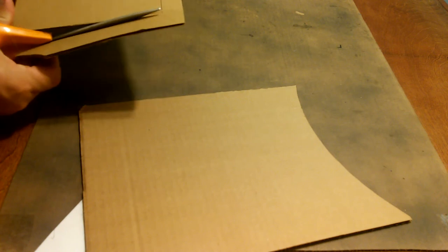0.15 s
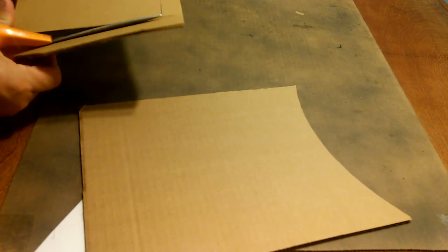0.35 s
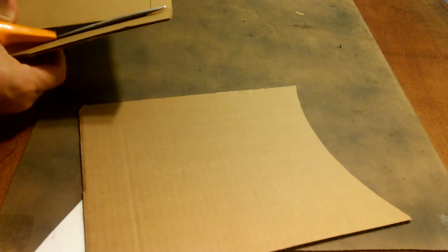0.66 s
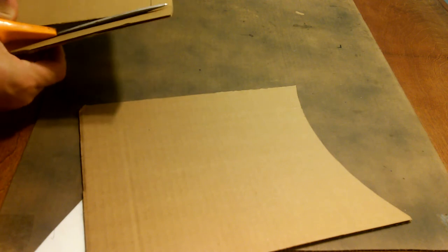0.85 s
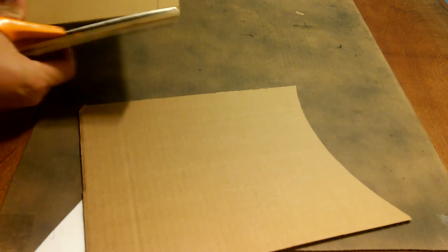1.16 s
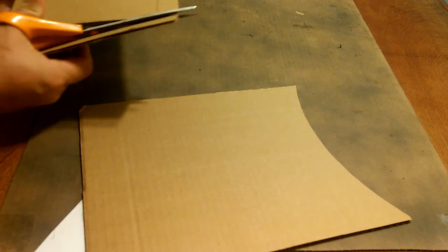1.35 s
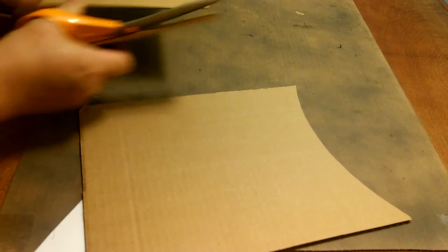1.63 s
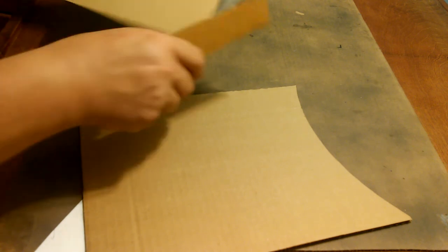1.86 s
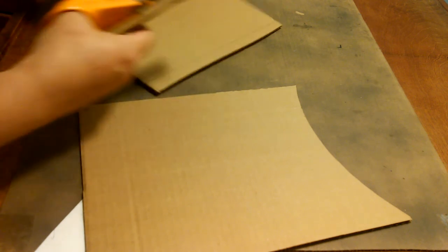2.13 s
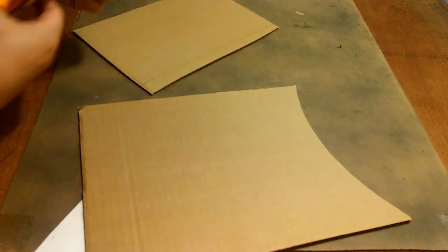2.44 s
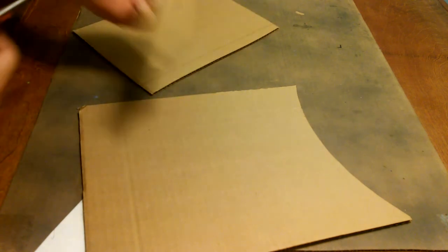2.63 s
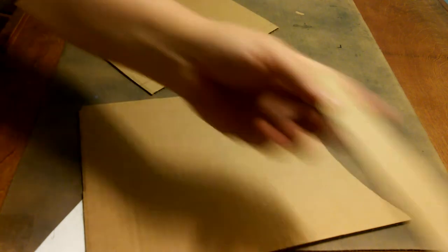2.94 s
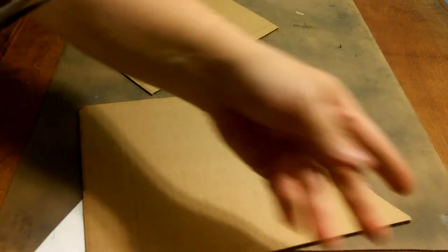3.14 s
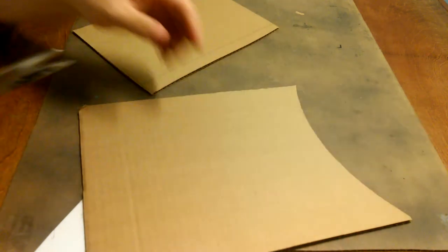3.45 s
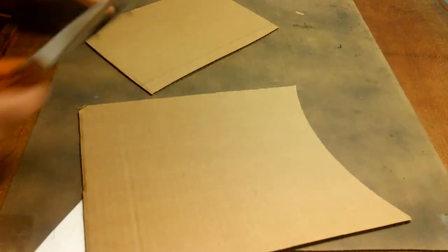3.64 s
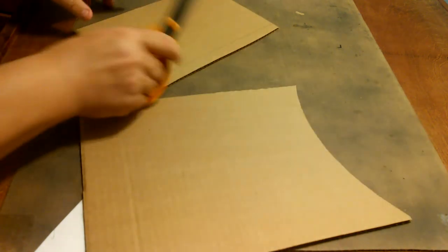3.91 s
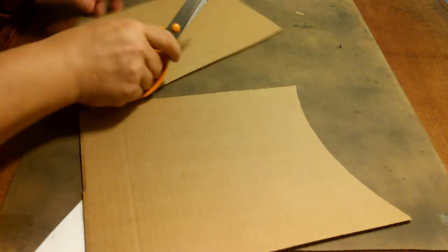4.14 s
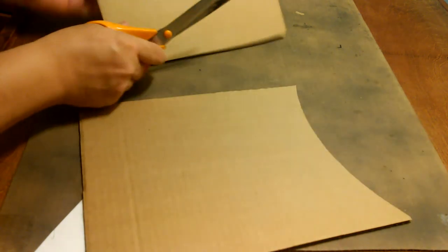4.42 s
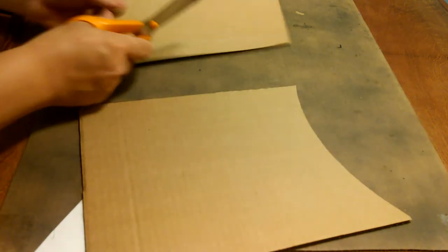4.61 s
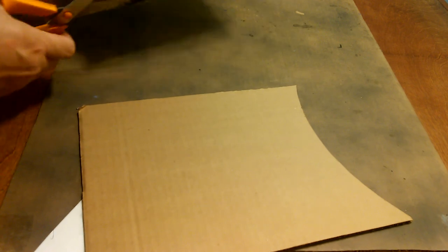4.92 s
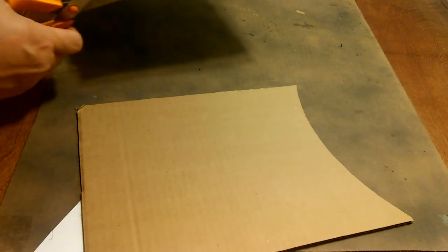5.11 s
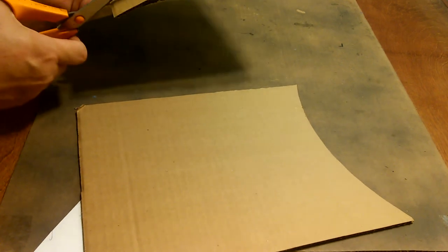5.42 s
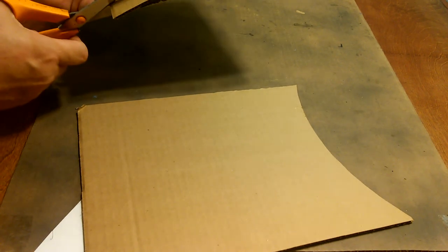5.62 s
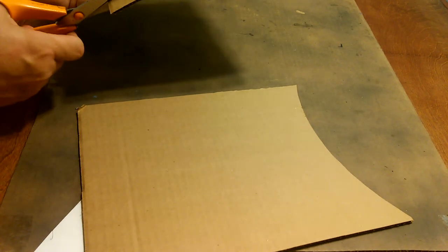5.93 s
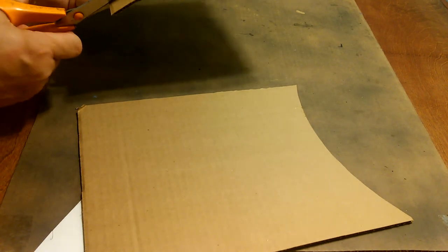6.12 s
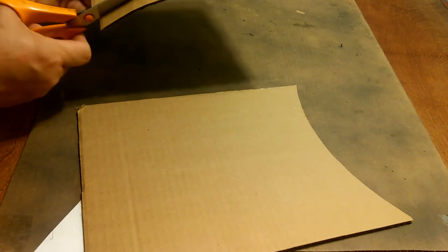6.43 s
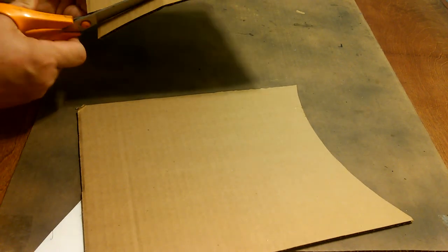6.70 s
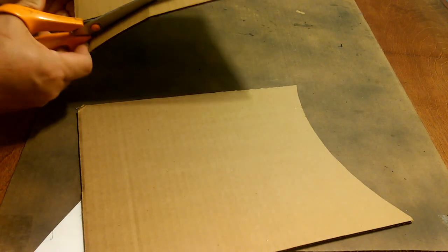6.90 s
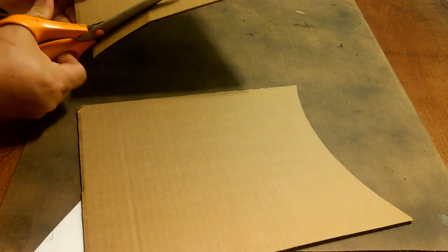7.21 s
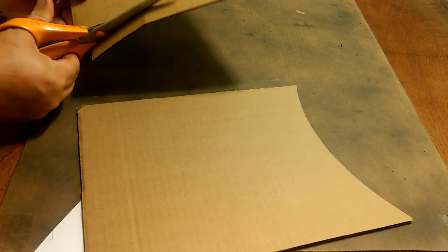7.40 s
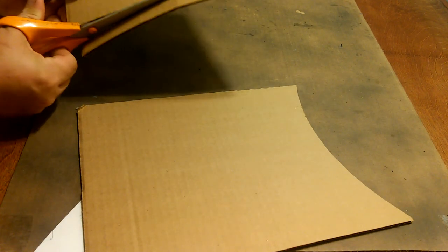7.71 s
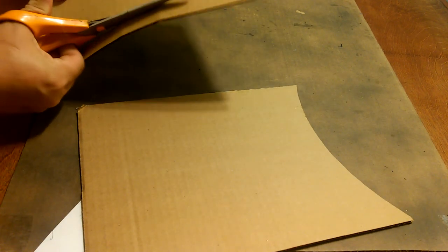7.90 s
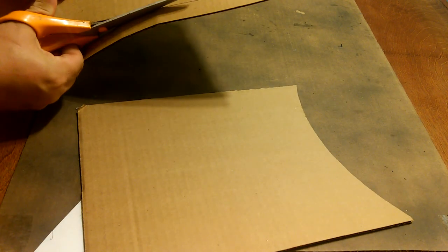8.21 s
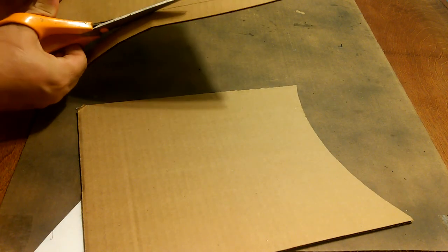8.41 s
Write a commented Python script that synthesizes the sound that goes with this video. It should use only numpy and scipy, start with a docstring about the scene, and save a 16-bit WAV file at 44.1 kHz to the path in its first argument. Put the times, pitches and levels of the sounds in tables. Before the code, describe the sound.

Close, bright sound of scissors cutting corrugated cardboard at a table in a small room. Sharp crunches and steely rubs come first, then a sheet slaps down, with light scrapes, ticks and dull knocks of handling. After a near-quiet pause with one tiny pivot squeak and a faint card creak, three strong crackling cuts follow. A low mains hum stays faintly underneath.

```python
"""Scissors bite through corrugated cardboard at a work table in a small room: flutes crack in spiky noise bursts
with single-fibre ticks between, and blades and sheets rub as grainy noise with a ringing edge.
Sheets and handles drop onto resonant modes, edges catch as narrow noise, and the pivot squeaks once as a
pitched tone before the card creaks. Mains hum and room noise lie underneath; the mono sound is bright, each
stretch of it gets a noise-built reverb tail, and a noise gate ducks the quiet moments."""
import sys
import numpy as np
from scipy import signal
from scipy.fft import rfft, irfft, next_fast_len
from scipy.io import wavfile
from scipy.ndimage import uniform_filter1d, map_coordinates

SR = 44100
rng = np.random.default_rng(int(sys.argv[2]) if len(sys.argv) > 2 else 0)


def generate_wav(signal):
    """Clip the signal to [-1, 1] and save it as 16-bit WAV at the path in sys.argv[1]."""
    frames = np.transpose(np.atleast_2d(signal))
    scaled = np.clip(frames, -1, 1) * 32767
    pcm = np.round(scaled).astype(np.int16)
    wavfile.write(sys.argv[1], SR, pcm)


N = 377055  # samples, about 8.55 s

# Mains hum lines: pitch_hz, level_db (rms, before a slow wobble)
HUM_LINES = [(59, -73), (108, -81.5), (120.5, -64.5), (150, -85.5), (185, -83), (314, -96.5)]
# Colour of the room's own noise: frequency_hz, density_db (relative, per Hz)
ROOM_NOISE = [(20, -14), (55, -1.5), (130, 1.5), (250, -12.5), (600, -23), (3000, -24), (8000, -31),
              (14000, -23), (16000, -29.5)]
# Rubbing strokes of steel and card: start_s (hold begins), held_s, hiss_db, mid_db (re hiss),
# board_db (re hiss), edge_hz
STROKES = [(0.099, .05, -83, -2, 2, 2560), (.25, 0.24, -46.5, -22, -29, 2780),
           (0.598, 0.051, -30.5, -16, -32, 4360), (.77, 0.056, -74, 1, -4, 2997),
           (0.931, 0.066, -49, -39.5, -38, 2710), (0.996, 0.012, -40, -13.5, -28, 2758),
           (1.226, 0.044, -28.5, -18, -25, 3506), (1.382, 0.087, -44.5, -24, -22.5, 3350),
           (1.62, 0.1, -44.5, -17, -23, 2200), (1.79, 0.033, -46, -20, -25.5, 2100),
           (1.862, 0.051, -54, -22, -29, 2367), (1.968, 0.099, -38.5, -26, -34, 2900),
           (2.116, 0.0031, -31, -18.5, -16, 1822), (2.201, 0.054, -45, -20, -23.5, 3033),
           (2.47, 0.046, -32.5, -19, -55, 5308), (2.63, 0.064, -39.5, -23.5, -41, 3686),
           (2.73, 0.043, -47, -24, -38.5, 3970), (2.799, 0.077, -39, -26.5, -45.5, 4100),
           (2.968, 0.0076, -50, -30, -62.5, 4600), (3.03, 0.086, -67, -5.5, -19.5, 3520),
           (3.27, 0.011, -52.5, 5, -5.5, 4480), (3.39, 0.031, -57, -15, -14, 3507),
           (3.466, .005, -41, -8.5, -31, 2880), (3.529, 0.097, -59.5, -14, -22, 3540),
           (3.82, 0.19, -65.5, -10, -25, 5360), (3.972, 0.037, -41, -22.5, -39, 4710),
           (4.052, 0.041, -35.5, -17, -51, 5340), (4.122, 0.085, -44, -16, -44, 4885),
           (4.274, 0.16, -28, -13.5, -45, 3640), (4.439, 0.13, -35, -13, -16, 3455),
           (4.65, .12, -50.5, -25, -21, 2426), (4.841, 0.032, -38.5, -15.5, -45, 4390),
           (5.03, 0.028, -75, -2.5, -10.5, 2970), (5.13, 0.068, -47, -22.5, -18, 2980),
           (5.21, 0.062, -67.5, -22.5, -9, 3320), (5.88, 0.026, -76.5, -31, -22, 4500),
           (5.929, .01, -41, -31.5, -35, 5105), (6.368, 0.072, -28.5, -16, -32, 3950),
           (6.554, 0.0078, -34.5, -27, -41, 4590), (6.819, 0.06, -26, -19, -24.5, 2502),
           (7.03, .06, -71.5, -2.5, -3.5, 2600), (7.202, 0.087, -43, -19.5, -31, 5220),
           (7.331, 0.037, -77, -19, -8, 4020), (7.42, 0.026, -53, -37, -29, 2974),
           (7.472, 0.081, -44.5, -17, -29, 3074), (7.808, 0.055, -24, -16, -22.5, 3854),
           (8.05, 0.022, -60.5, -8, -11, 5235), (8.108, 0.0067, -38.5, -16.5, -33, 5720),
           (8.16, 0.052, -59, -8, -21.5, 5150), (8.34, 0.068, -33.5, -17, -39, 4915),
           (8.51, 0.044, -45.5, -35, -27, 5714)]
# Flutes cracking and edges ticking: start_s, level_db (burst energy re a 1 ms click), mid_db (re hiss),
# board_db (re hiss), edge_hz, board_hz (favoured modes), decay_t60_s
CRACKS = [(0.2243, -36.5, -39, -34, 3350, 342, 0.026), (0.2513, -23.5, -26, -38.5, 2450, 985, 0.028),
          (0.2989, -29.5, -24, -49.5, 1950, 1320, 0.022), (0.367, -4.5, -12, -14.5, 1670, 1510, 0.05),
          (0.374, -1, -13.5, -13, 1610, 920, 0.03), (0.417, -7, -13, -14.5, 1920, 465, 0.015),
          (0.578, -26, -24, -25, 1610, 1490, 0.026), (0.5905, -21.5, -23, -25.5, 5350, 1020, 0.026),
          (0.9244, -34.5, -35.5, -33.5, 5680, 511, 0.029), (1.0032, -13.5, -12.5, -21, 1650, 1250, 0.015),
          (1.0096, -5, -16.5, -13.5, 1680, 950, 0.038), (1.0291, -3.5, -16.5, -17, 4430, 1250, 0.024),
          (1.0454, -6, -16, -11.5, 2090, 670, 0.025), (1.2088, -23, -18.5, -25, 3450, 550, 0.024),
          (1.4175, -1.5, -16, -20.5, 3300, 942, 0.021), (1.427, 0.5, -13, -10.5, 1650, 1520, 0.011),
          (1.431, -2.5, -8.5, -12.5, 1940, 560, 0.036), (1.5907, -25, -21, -35.5, 2110, 1140, 0.016),
          (1.5974, -14.5, -17.5, -26, 2090, 1100, 0.034), (1.8636, -34.5, -38, -41.5, 2930, 1207, 0.024),
          (2.0236, -16, -13.5, 0.5, 1800, 608, 0.029), (2.0444, -20.5, -26, 4.5, 1680, 1080, 0.011),
          (2.4127, -25, -13.5, -46.5, 3080, 680, 0.072), (2.4537, -28, -16, -40.5, 3600, 1300, 0.026),
          (2.4885, -26, -7.5, -44.5, 5370, 1208, 0.026), (2.6066, -31.5, -27, -40, 3050, 510, 0.026),
          (2.9532, -31, -26, -48.5, 3640, 306, 0.018), (2.9676, -20, -27.5, -64, 2730, 301, 0.011),
          (3.1917, -23, -18.5, -43, 4770, 1150, 0.026), (3.2015, -15, -15.5, -55, 4370, 353, 0.022),
          (3.2327, -19.5, -12, -28, 2800, 904, 0.022), (3.239, -11.5, -15, -35, 2320, 851, 0.013),
          (3.2508, -16.5, -7, -35, 2950, 859, 0.015), (3.3184, -33.5, -25, -25, 2040, 953, 0.018),
          (3.3466, -17, -12, -36, 4010, 487, 0.018), (3.356, -33, -26, -23, 4670, 856, 0.019),
          (3.4125, -26.5, -11, -28.5, 3040, 697, 0.028), (3.4386, -29, -23, -22.5, 2195, 1150, 0.01),
          (3.463, -24, -13.5, -37, 2300, 1330, 0.019), (3.476, -33, -32, -34, 2660, 1130, 0.026),
          (3.6166, -44.5, -28, -38, 2530, 630, 0.026), (3.9215, -35.5, -19.5, -32.5, 5530, 413, 0.038),
          (3.9763, -30.5, -20, -39, 1970, 1080, 0.026), (4.2452, -27, -17, -47, 2570, 298, 0.038),
          (4.2726, -26, -26, -37, 5170, 1080, 0.029), (4.3343, -15.5, -31, 2.5, 1670, 815, 0.034),
          (4.5395, -21, -27, -18.5, 5460, 435, 0.038), (4.624, -20, -11.5, -21.5, 2140, 460, 0.045),
          (4.815, -32, -23, -36.5, 3180, 318, 0.038), (5.1137, -36.5, -24.5, -15, 2470, 1040, 0.029),
          (5.895, -44, -19.5, -28.5, 5730, 493, 0.026), (5.928, -24, -30.5, -41, 3670, 1020, 0.036),
          (5.9678, -14.5, -21.5, -25.5, 5660, 1070, 0.02), (6.0103, -7, -25, -31.5, 4870, 861, 0.026),
          (6.038, -10, -15, -46, 5520, 802, 0.049), (6.0402, -1.5, -24.5, -27, 3420, 695, 0.023),
          (6.066, -6, -16, -20, 5360, 716, 0.047), (6.0788, -8, -15.5, -14.5, 4140, 692, 0.035),
          (6.103, -7.5, -15.5, -12.5, 5260, 694, 0.034), (6.1389, -3.5, -17, -15, 4870, 780, 0.025),
          (6.169, -10, -20, -8.5, 2300, 756, 0.022), (6.194, -13, -11.5, -9.5, 1670, 790, 0.016),
          (6.3577, -22.5, -22.5, -38, 5010, 856, 0.03), (6.5573, -24, -28, -51, 5030, 431, 0.023),
          (6.586, -24, -16, -25.5, 4790, 533, 0.024), (6.5964, -10, -19, -25.5, 2170, 730, 0.026),
          (6.5952, -2, -19.5, -13, 1640, 875, 0.045), (6.6277, -10.5, -12.5, -5, 4820, 870, 0.015),
          (6.6345, -3, -19, -6.5, 4770, 600, 0.034), (6.6544, -5.5, -13, -11.5, 4900, 574, 0.03),
          (6.741, -19.5, -9, -27, 4800, 589, 0.023), (6.8066, -23.5, -17, -27.5, 5120, 1340, 0.026),
          (6.8666, -13, -12, -8, 1760, 1260, 0.018), (7.1927, -32.5, -20, -34, 5500, 1350, 0.041),
          (7.4749, -28.5, -14, -16.5, 2660, 1060, 0.031), (7.5318, -7, -18.5, -11.5, 4450, 696, 0.046),
          (7.5578, -3, -14.5, -11.5, 4700, 1340, 0.022), (7.5813, -3, -14, -7.5, 4660, 870, 0.039),
          (7.5885, -7, -29, -11, 1600, 721, 0.026), (7.5991, -7, -13.5, -14, 1570, 410, 0.012),
          (7.6153, -6.5, -17.5, -10, 1900, 393, 0.029), (7.759, -33.5, -19, -18, 2270, 786, 0.03),
          (7.794, -23, -22, -11, 1850, 427, 0.031), (7.8242, -14.5, -16.5, -17, 2400, 1300, 0.044),
          (8.0444, -32, -30, -26, 2490, 1370, 0.032), (8.096, -28, -23, -23.5, 4830, 1040, 0.037),
          (8.303, -34, -21, -20.5, 5100, 1340, 0.037), (8.5054, -26, -20.5, -27, 5540, 1320, 0.021)]
# Single fibres parting: centre_s, peak_db
FIBRE_TICKS = [(0.3755, -6), (1.0038, -17.5), (1.0112, -13.5), (1.0477, -11), (1.5926, -27), (1.5955, -26),
               (1.6002, -26.5), (2.4219, -30), (2.9702, -18), (3.1942, -31), (3.2033, -13), (3.2348, -18),
               (3.2402, -3), (3.2527, -24), (3.3177, -24), (3.3493, -22), (3.3574, -24), (3.4414, -27),
               (3.4646, -28), (3.4707, -31), (3.478, -26), (4.4961, -27), (4.6394, -29), (5.9275, -25),
               (6.0112, -16), (6.0388, -7.5), (6.0433, -7), (6.0485, -11), (6.0681, -10), (6.1412, -6),
               (6.1687, -11), (6.1953, -10.5), (6.1983, -17.5), (6.5625, -28), (6.5901, -21),
               (6.6002, -1.5), (6.6315, -9), (6.6388, -8), (6.6572, -6), (6.6711, -11), (6.7432, -25),
               (6.8685, -8), (7.5354, -15), (7.5569, -5), (7.5602, -6), (7.6039, -9), (7.6207, -9),
               (7.6819, -27), (7.8256, -19)]
# Sheets and handles landing: start_s, slap_db (energy re a 1 ms click), thump_db (re slap),
# slap_hz, thump_hz (favoured modes), rattle_t60_s
KNOCKS = [(1.425, -21, -15, 1250, 264.5, 0.022), (2.024, -8, -16, 657, 246, 0.028),
          (2.03, -45.5, 13.5, 601, 70, .1), (2.044, -20.5, -7, 1126, 199.6, 0.16),
          (3.203, -64.5, 21, 339, 150.2, 0.091), (3.234, -46, 5.5, 856, 128, 0.2),
          (3.444, -45.5, -15.5, 1150, 124, 0.066), (4.099, -72, 31.5, 301, 197, 0.086),
          (4.324, -31.5, 7.5, 444, 129, 0.18), (4.337, -17.5, -2, 755, 85.5, 0.17),
          (4.492, -26, 6.5, 700, 208, 0.078), (4.517, -46, 20.5, 334, 125.9, 0.052),
          (4.566, -71, 24, 902, 116, 0.081), (4.638, -57, 23, 432, 110, 0.05),
          (5.116, -41, -23, 1070, 127.4, 0.13), (5.616, -59, -29.5, 947, 120, 0.13),
          (5.97, -46.5, -30.5, 1070, 202.3, 0.06), (6.142, -32.5, -4, 780, 216, 0.056),
          (6.866, -29.5, -44.5, 1290, 128, 0.19), (7.26, -70, 16, 404, 200, .06),
          (7.586, -15, -13.5, 996, 299.4, 0.04), (7.603, -11.5, -17, 390, 270, 0.033)]
# Edges catching in brief pitched scrapes: start_s, pitch_hz, level_db (rms before the swell), length_s
CATCHES = [(1.591, 2054, -38, 0.022), (1.685, 3550, -61.5, 0.035), (1.774, 2080, -63, 0.056),
           (2.412, 2290, -58, 0.029), (2.49, 5450, -43, 0.024), (2.493, 1230, -64, 0.028),
           (2.623, 3060, -65, .053), (2.676, 3680, -65, 0.066), (2.797, 2280, -75, 0.11),
           (2.963, 2700, -74, 0.022), (3.072, 1390, -74.5, .06), (3.087, 2600, -70.5, .037),
           (3.229, 881, -45, 0.032), (3.781, 6640, -70.5, 0.16), (7.278, 780, -60.5, 0.035),
           (7.821, 1282, -34.5, 0.024), (8.086, 4810, -63.5, .11), (8.33, 4830, -55.5, .069),
           (8.341, 1236, -61, .088), (8.373, 1740, -56, .034)]
# Glide of the squeaking pivot: time_s, pitch_hz, level_db, octave_db
PIVOT_GLIDE = [(5.31, 1049, -99, -118), (5.346, 1072, -61.5, -80), (5.36, 1067, -52, -73),
               (5.378, 1082, -51, -84), (5.416, 1078, -49, -73), (5.488, 1075, -73, -103),
               (5.544, 1076, -77.5, -102), (5.58, 1049, -85, -110)]
# Glide of the flexing card: time_s, pitch_hz, level_db (before wobble), lower_mode_db
CREAK_GLIDE = [(5.5, 920, -90, -100), (5.525, 910, -64.5, -89.5), (5.56, 990, -76, -90),
               (5.6, 969, -69, -82.5), (5.618, 950, -55.5, -74), (5.685, 953, -64.5, -76),
               (5.72, 964, -85, -100), (5.76, 980, -77.5, -105), (5.79, 950, -95, -110)]

# Resonances of the held sheet: centre_hz, width_hz, level_db
HELD_SHEET = [(306, 20, 1), (410, 53, 2.5), (567, 86, 0.5), (721, 37, -0.5), (883, 96, 1), (1076, 130, 1.5),
              (1270, 560, -4), (1810, 90, -8.5)]
# Resonances of a sheet lying on the table: centre_hz, width_hz, level_db
LYING_SHEET = [(320, 56, -11), (445, 29, 1.5), (554, 51, -14), (643, 37, 5), (873, 120, -9.5),
               (1047, 130, 3), (1255, 210, -4.5)]
# Resonances of the table top: centre_hz, width_hz, level_db
TABLE_TOP = [(66.5, 110, -12.5), (121, 50, 3), (139, 110, -3), (201, 29, -5), (255, 37, -2)]
# Colour of the edge noise in the mids: frequency_hz, density_db (relative, per Hz)
MID_COLOUR = [(1500, -16), (1900, -3), (2500, -3), (3000, -4.5), (4500, -4), (6000, 0.5), (7500, -0.5),
              (9000, -34.5)]
# Colour of the treble: frequency_hz, density_db (relative, per Hz)
HISS_COLOUR = [(5000, -36.5), (7000, -19.5), (8500, -12.5), (11000, -7), (13000, -1), (14500, -4),
               (16000, 0.5)]
# Decay of the room by band: frequency_hz, t60_s
ROOM_DECAY = [(150, 0.37), (600, 0.19), (2000, 0.32), (8000, 0.27), (15000, 0.22)]

GRIP_DB_PER_S, LET_GO_DB_PER_S = 707.5, 346  # how fast a stroke takes hold and dies away
ARCH_DB = 2  # a held stroke is this much weaker at both ends than in its middle
FIRST_FIBRE_DB = -11.5  # the tick that opens every crack, re its hiss
TICK_S = 0.0006  # half width of a fibre tick
CATCH_WIDTH = 0.07  # width of a catch's ring as a share of its pitch
HIT_SEND_DB, RUB_SEND_DB, TICK_SEND_DB = -3, -6.5, -9  # how much of each group feeds the room
GATE_FLOOR_DB, GATE_BELOW_DB = -70, 31  # absolute threshold; distance under the recent level
GATE_MEMORY_S, GATE_SOFT_DB, GATE_DEPTH_DB = 0.12, 3, 10
TOP_HZ = 15850  # band limit


def amp(db):
    """Decibels to amplitude."""
    return 10 ** (np.asarray(db) / 20)


def unit(x):
    """x scaled to an rms of one."""
    return x / np.sqrt(np.mean(x ** 2) + 1e-20)


def peak(x):
    """x scaled to a peak of one."""
    return x / np.max(np.abs(x))


def energy(x):
    """x scaled so that a burst of any shape carries the energy of a 1 ms click."""
    return x / np.linalg.norm(x) * np.sqrt(SR / 1000)


def along(points, hz):
    """Interpolate (Hz, value) points on a log frequency axis."""
    point_hz, values = np.transpose(points)
    return np.interp(np.log(hz + 1), np.log(point_hz + 1), values)


def curves(rows, silent=-140):
    """One value per sample for each column after the time; silent fills both outer ends."""
    s, *columns = np.transpose(rows)
    time = np.arange(N) / SR
    return [np.interp(time, s, column, left=silent, right=silent) for column in columns]


def wobble(rate):
    """A smooth random curve, rate knots a second."""
    knots = rng.standard_normal(int(N * rate / SR) + 4)
    return map_coordinates(knots, [np.arange(N) * rate / SR])


def filtered(x, response):
    """x shaped by a real or complex response of frequency."""
    size = next_fast_len(x.shape[-1] + 4096)
    spectrum = rfft(x, size) * response(np.fft.rfftfreq(size, 1 / SR))
    return irfft(spectrum, size)[..., :x.shape[-1]]


def colour(points):
    """A noise colour table as a filter response."""
    return lambda hz: amp(along(points, hz))


def ring(hz, centre_hz, lift_db, octaves):
    """Gain of one broad resonance standing on a spectrum."""
    return amp(lift_db * np.exp(-(np.log2((hz + 1) / centre_hz) / octaves) ** 2))


def modes(table, scatter_db=0, centre_hz=700, slope_db=0):
    """Causal resonances at random strengths; grip and place favour those near centre_hz."""
    near_db = [-slope_db * abs(np.log2(c / centre_hz)) for c, _, _ in table]
    gains = amp(scatter_db * rng.standard_normal(len(table)) + near_db)

    def response(f):
        total = 0
        for k, (gain, (c, width, db)) in enumerate(zip(gains, table)):
            resonance = 1j * f * width / (c * c - f * f + 1j * f * width)
            total = total + (-1) ** k * gain * amp(db) * resonance  # neighbours in opposite phase
        return total
    return response


def turning_phase(hz, jitter, rate):
    """Running phase of a tone whose pitch jitters."""
    # abs keeps the silent filler a valid pitch
    return 2 * np.pi * np.cumsum(np.abs(hz) * (1 + jitter * wobble(rate))) / SR


def hum():
    """Slightly unsteady mains lines over the room's own noise."""
    t = np.arange(N) / SR
    lines = np.zeros(N)
    for hz, db in HUM_LINES:
        level = np.sqrt(2) * amp(db + 3.1 * wobble(11))
        lines += level * np.sin(2 * np.pi * hz * t + 0.43 * wobble(33))
    air = unit(filtered(rng.standard_normal(N), colour(ROOM_NOISE)))
    return lines + amp(-71) * air


def rubbing():
    """Friction noise with a grainy grip; the rubbed edge rings at a moving pitch, the sheet hums along."""
    time, gains = np.arange(N) / SR, np.zeros((3, N))
    for s, held, db, mid_db, board_db, _ in STROKES:
        loss_db = np.maximum(GRIP_DB_PER_S * (s - time), LET_GO_DB_PER_S * (time - s - held)).clip(0)
        loss_db += ARCH_DB * np.clip(2 * (time - s) / max(held, 0.002) - 1, -1, 1) ** 2
        gains += amp([[db], [db + mid_db], [db + board_db]]) * amp(-loss_db)
    hiss_gain, mid_gain, board_gain = gains
    edge_hz = curves(np.array(STROKES)[:, [0, -1]], silent=3000)[0]
    grip = unit(amp(1.7 * wobble(60) + 0.27 * wobble(760)))

    def layer(response):
        return unit(filtered(rng.standard_normal(N), response))

    # the mids follow the edge pitch and break into random patches of time and frequency
    hz, t, z = signal.stft(layer(colour(MID_COLOUR)), SR, nperseg=512)
    lift = ring(hz[:, None], np.interp(t, time, edge_hz), lift_db=5, octaves=0.2)
    patches = uniform_filter1d(uniform_filter1d(rng.standard_normal(z.shape), 4, 0), 12, 1)
    patchy = z * lift * amp(3.8 * unit(patches))
    mids = unit(signal.istft(patchy, SR, nperseg=512)[1][:N])
    hiss = layer(colour(HISS_COLOUR))
    board = layer(modes(HELD_SHEET))
    return grip * (hiss_gain * hiss + mid_gain * mids + board_gain * board)


def cracks():
    """A flute gives way in a spiky burst of tearing fibres that also shakes the held sheet."""
    out, t = np.zeros(N + SR), np.arange(SR // 8) / SR
    for s, db, mid_db, board_db, edge_hz, board_hz, t60 in CRACKS:
        fade = peak(amp(-60 * t / max(t60, 0.003)) * (1 - np.exp(-t / 0.014)))
        fibres = fade * amp(2.6 * map_coordinates(rng.standard_normal(400), [t * 1100]))  # spikes, 1100 knots/s
        noise = rng.standard_normal((3, len(t)))
        hiss = filtered(noise[0], colour(HISS_COLOUR))
        mid = filtered(noise[1], lambda hz: colour(MID_COLOUR)(hz) * ring(hz, edge_hz, lift_db=9.5, octaves=0.41))
        sheet = modes(HELD_SHEET, scatter_db=-0.5, centre_hz=board_hz, slope_db=12.5)
        # a small sheet shakes longer, without bass
        shaking = noise[2] * fibres ** 0.53
        board = energy(filtered(shaking, lambda hz: sheet(hz) * (1j * hz / (280 + 1j * hz)) ** 2))
        burst = energy(hiss * fibres) + amp(mid_db) * energy(mid * fibres) + amp(board_db) * board
        # the first fibre parts with a dry tick
        first_fibre = rng.standard_normal(len(t)) * amp(-60 * t / 0.0073)
        tick = amp(FIRST_FIBRE_DB) * energy(filtered(first_fibre, colour(HISS_COLOUR)))
        out[round(s * SR):][:len(t)] += amp(db) * (burst + tick)
    return filtered(out[:N], lambda hz: (1j * hz / (150 + 1j * hz)) ** 3)  # the cracks carry no low bass


def fibre_ticks():
    """Each single fibre parts in a bright, dry pinch of treble about a millisecond long."""
    out, t = np.zeros(N), np.arange(-128, 128) / SR
    for s, db in FIBRE_TICKS:
        noise = rng.standard_normal(len(t))
        treble = filtered(noise, lambda hz: colour(HISS_COLOUR)(hz) * (hz < TOP_HZ))
        pinch = treble * np.exp(-(t / TICK_S) ** 2)
        out[round((s + t[0]) * SR):][:len(t)] += amp(db) * peak(pinch)
    return out


def knocks():
    """A rattling slap rings the lying sheet; one soft push rings the table top."""
    out, t = np.zeros(N + SR), np.arange(SR // 3) / SR
    for s, db, low_db, slap_hz, thump_hz, t60 in KNOCKS:
        rattle = rng.standard_normal(len(t)) * amp(-60 * t / max(t60, 0.01))
        slap = energy(filtered(rattle, modes(LYING_SHEET, scatter_db=6.5, centre_hz=slap_hz, slope_db=6.5)))
        push = t / 0.0008 * np.exp(-t / 0.0007)
        top = modes(TABLE_TOP, scatter_db=7.0, centre_hz=thump_hz, slope_db=12.5)
        # the thump carries little deep bass
        thump = energy(filtered(push, lambda hz: top(hz) * 1j * hz / (90 + 1j * hz)))
        out[round(s * SR):][:len(t)] += amp(db) * (slap + amp(low_db) * thump)
    return out[:N]


def catches():
    """An edge catches as narrow friction noise that swells quickly and fades."""
    out = np.zeros(N + SR)
    for s, hz, db, length in CATCHES:
        u = np.arange(SR // 4) / SR / length  # time in lengths
        mode = modes([(hz, CATCH_WIDTH * hz, 0)])
        band = unit(filtered(rng.standard_normal(len(u)), lambda f: mode(f) ** 2))
        swell = np.minimum(6 * u, 1) * np.exp(-u ** 2)
        out[round(s * SR):][:len(u)] += amp(db) * band * swell
    return out[:N]


def pivot_squeak():
    """The pivot sticks and slips at a steady pitch: a sine and its octave."""
    hz, db, octave_db = curves(PIVOT_GLIDE)
    phase = turning_phase(hz, jitter=0.0031, rate=80)
    return np.sqrt(2) * (amp(db) * np.sin(phase) + amp(octave_db) * np.sin(2 * phase))


def card_creak():
    """Flexing card creaks as a rougher, jittering tone with noise through one lower mode."""
    hz, db, lower_db = curves(CREAK_GLIDE)
    tone = amp(db + 3.6 * wobble(48)) * np.sin(turning_phase(hz, jitter=0.026, rate=200))
    lower_mode = modes([(630, 67, 0)])
    lower = unit(filtered(rng.standard_normal(N), lambda f: lower_mode(f) ** 2))
    return np.sqrt(2) * tone + amp(lower_db) * lower


def room(x, size=8192):
    """Each stretch of sound gets its own reverberant noise tail, dying band by band."""
    out, fade = np.zeros(N + SR), np.hanning(2 * size + 1)[:-1]
    padded = np.pad(x, (size, 2 * size))
    for at in range(0, N + size, size):
        hz, t, z = signal.stft(rng.standard_normal(SR // 3), SR, nperseg=256)
        decay = amp(-60 * t / along(ROOM_DECAY, hz)[:, None])
        tail = signal.istft(z * decay, SR, nperseg=256)[1]
        wet = signal.fftconvolve(padded[at:at + 2 * size] * fade, tail / np.linalg.norm(tail))
        out[at:at + len(wet)] += wet[:len(out) - at]
    return np.pad(out[size:], (130, 0))[:N]  # the tail starts 130 samples (3 ms) late


def scene():
    """Sum the dry sources, their room sound and the hum, alike in two channels."""
    hits = cracks() + knocks()
    rubs = rubbing() + catches() + pivot_squeak() + card_creak()
    ticks = fibre_ticks()
    send = amp(HIT_SEND_DB) * hits + amp(RUB_SEND_DB) * rubs + amp(TICK_SEND_DB) * ticks
    sound = hits + rubs + ticks + room(send) + hum()
    return np.array([sound, sound])


def record(dry):
    """Gate sound far under its recent level or near silence, round off peaks and limit the band."""
    above_hum = filtered(dry[0], lambda hz: hz > 400)
    power = np.abs(uniform_filter1d(above_hum ** 2, size=1024)) + 1e-12
    keep = np.exp(-1 / (GATE_MEMORY_S * SR))
    recent = signal.lfilter([1 - keep], [1, -keep], power)
    threshold = amp(2 * GATE_FLOOR_DB) + amp(-2 * GATE_BELOW_DB) * recent  # doubled dB: these are powers
    open_db = 10 * np.log10(power / threshold)
    shut = 1 / (1 + np.exp(open_db / GATE_SOFT_DB) / 2.5)  # 0 open, 1 fully shut
    gated = dry[0] * amp(-GATE_DEPTH_DB * uniform_filter1d(shut, size=1024))
    rounded = gated / (1 + np.abs(gated / 0.85) ** 10) ** (1 / 10)  # only the loudest peaks give way
    out = filtered(rounded, lambda hz: 1 / (1 + (hz / TOP_HZ) ** 300))
    return np.array([out, out])


dry = scene()
out = record(dry)
generate_wav(out)
```